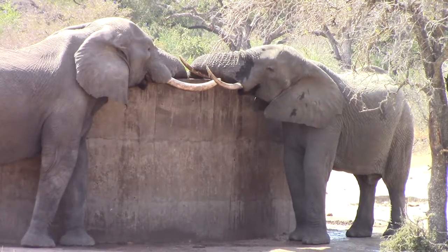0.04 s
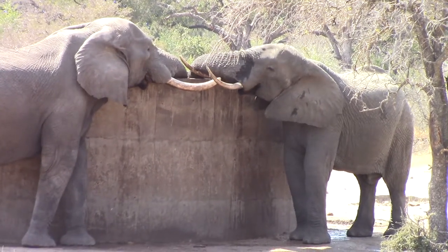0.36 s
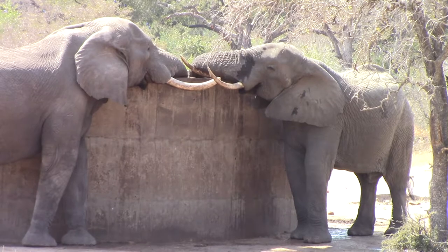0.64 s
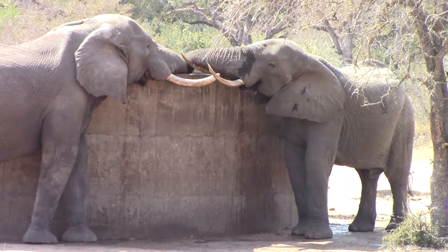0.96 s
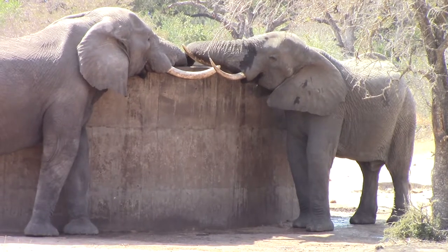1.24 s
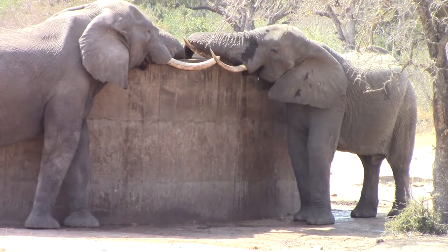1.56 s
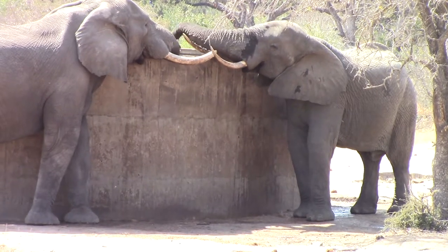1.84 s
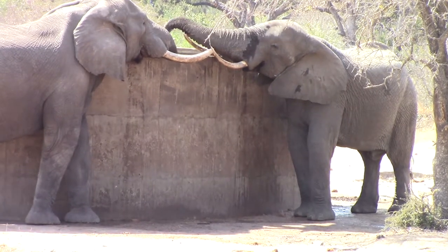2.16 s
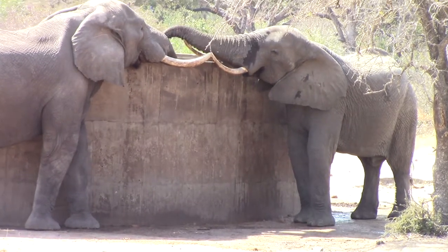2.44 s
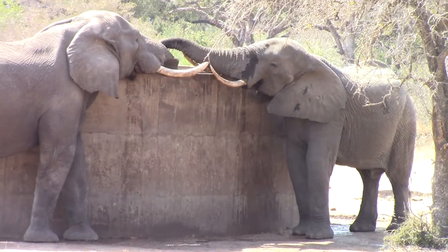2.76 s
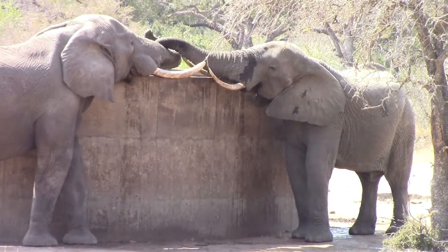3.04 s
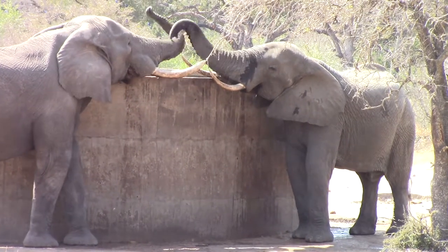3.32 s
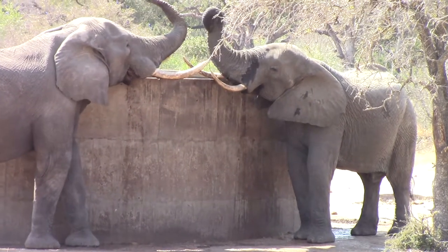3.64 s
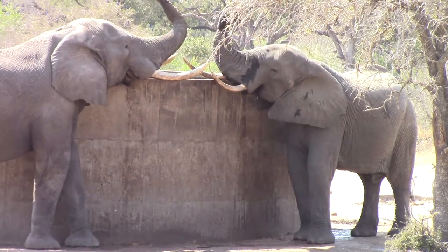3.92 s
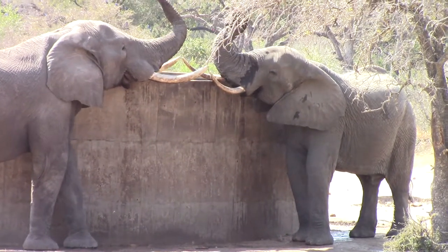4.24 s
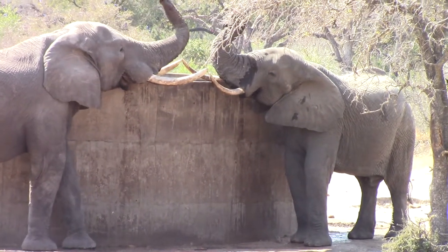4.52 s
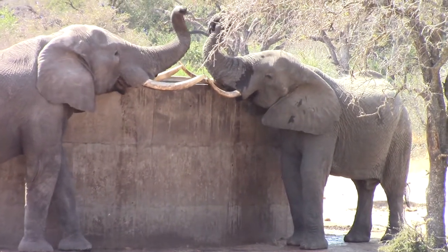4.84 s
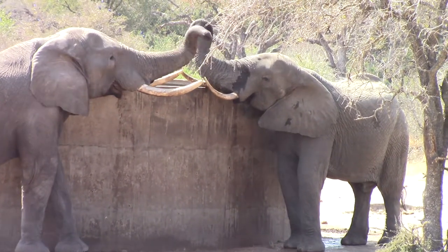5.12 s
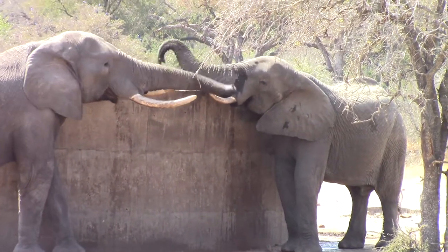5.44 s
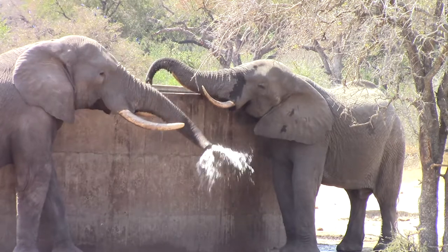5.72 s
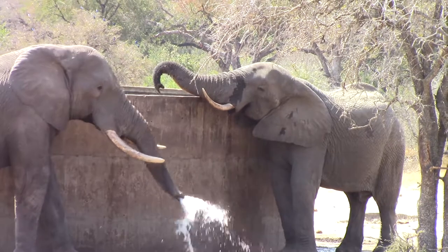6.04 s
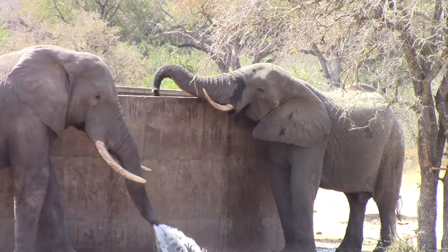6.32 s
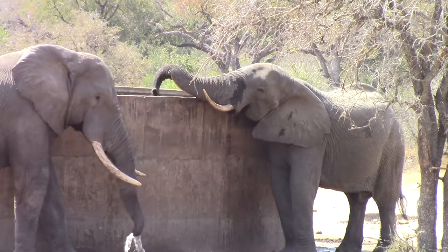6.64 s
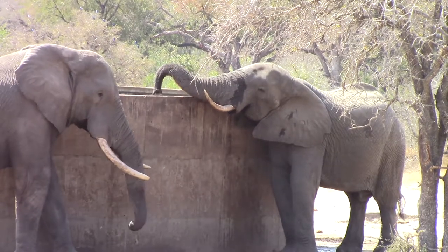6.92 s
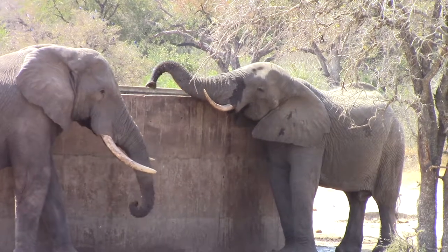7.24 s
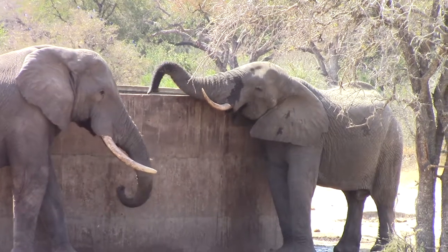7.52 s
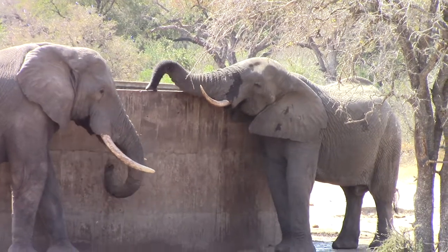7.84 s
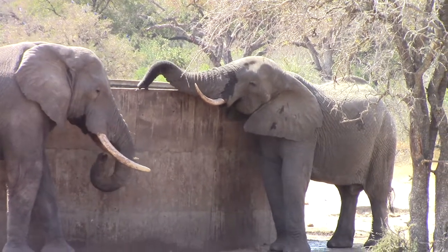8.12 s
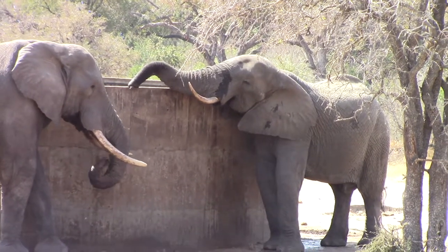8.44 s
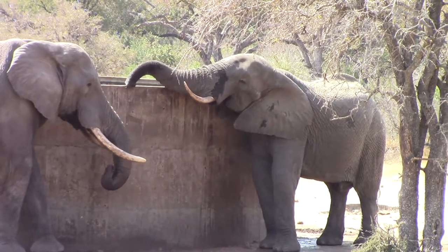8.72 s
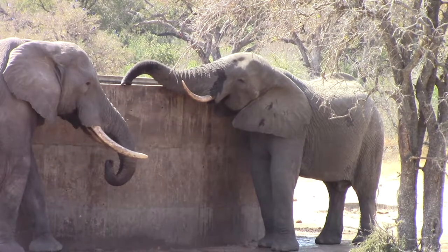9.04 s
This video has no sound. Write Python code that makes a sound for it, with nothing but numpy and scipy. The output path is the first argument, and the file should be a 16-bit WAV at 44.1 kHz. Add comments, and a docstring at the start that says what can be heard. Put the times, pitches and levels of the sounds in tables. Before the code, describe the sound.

Wind buffets the microphone outdoors in dry bush from the start, with low, fluttering thumps and crackles. It is loudest in the first half second, stays gusty until about 3 seconds, then thins out by 5. Behind it lie a faint hiss and a far-off chattering whirr, with a tiny bird peep near 3 seconds. Around 5.6 seconds an elephant starts spluttering water from its trunk. From 6 seconds, spray and heavy drops splash onto the ground in two quick surges, and a short, hollow puff of air rings the trunk at about 6.6. The patter dies away just after 7 seconds, as a distant bird gives one faint falling whistle. A soft, broad rush with a thin, wavering whine swells from there to the end at about 9 seconds, while dull wind bumps return from around 7.5.

```python
"""Elephants at a water tank

Dry bush, two close microphone ports, wind buffeting them. An elephant blows out a load of water:
drops spatter on the ground, a last puff of air rings the trunk, and the patter dies away.
Far off a faint whirr chatters; birds peep and whistle; a broad rush with a thin whine swells last."""
import sys
import numpy as np
from scipy import signal
from scipy.fft import rfft, irfft, next_fast_len
from scipy.io import wavfile

SR = 44100
rng = np.random.default_rng(int(sys.argv[2]) if len(sys.argv) > 2 else 0)


def generate_wav(sig):
    """Save sig (samples, or channels by samples) to the path in sys.argv[1] as 16-bit PCM at SR."""
    pcm = np.round(np.clip(np.atleast_2d(sig).T, -1, 1) * 32767).astype(np.int16)
    wavfile.write(sys.argv[1], SR, pcm)


N = 404397
TIME = np.arange(N) / SR


def undb(db):
    """Decibels to gain."""
    return 10 ** (np.asarray(db) / 20)


def unit(x):
    """Scale to rms 1."""
    return x / np.sqrt(np.mean(x ** 2) + 1e-30)


def curve(rows, column=1):
    """One column of a table, joined by straight lines in time."""
    rows = np.array(rows)
    return np.interp(TIME, rows[:, 0], rows[:, column])


def phase(hz):
    """Running phase of a pitch curve, in radians."""
    return 2 * np.pi * np.cumsum(hz) / SR


def shape(x, response):
    """Filter by a response given as a function of frequency."""
    size = next_fast_len(x.shape[-1], real=True)
    hz = np.maximum(np.arange(size // 2 + 1) * SR / size, 1)
    return irfft(rfft(x, size) * response(hz), size)[..., :x.shape[-1]]


def colour(x, points):
    """Filter through (hz, db) points, falling away below the first; rms 1."""
    hz, db = np.transpose(points)
    def response(f):
        return undb(np.interp(np.log(f), np.log(hz), db)) * np.minimum(f / hz[0], 1) ** 2
    return unit(shape(x, response))


def resonance(f, hz, width):
    """Response of one band-pass resonance."""
    return 1 / (1 + 1j * (f * f - hz * hz) / (f * width))


def ring(x, modes, widen):
    """Pass x through parallel resonances, their widths multiplied by widen."""
    return shape(x, lambda f: sum(undb(db) * abs(resonance(f, hz, widen * width)) ** 2
                                  for hz, width, db in modes))


def walk(per_s, size=N):
    """Smooth random wandering with a spread near 1."""
    at = np.arange(size) * per_s / SR
    knots = int(at[-1]) + 2
    return 1.4 * np.interp(at, np.arange(knots), rng.standard_normal(knots))


def blurred_tone(hz, per_s):
    """A tone on a pitch curve whose strength and phase wander."""
    return unit(walk(per_s) * np.cos(phase(hz)) + walk(per_s) * np.sin(phase(hz)))


def stereo(make, side_db, apart_hz):
    """Two close microphone ports: long waves reach both alike, short ones differ."""
    side = shape(make(), lambda f: 0.003 + 1 / np.sqrt(1 + (apart_hz / f) ** 4))
    return make() + undb(side_db) * side * np.array([[1], [-1]])


def burst(duration_s, rough_db, size):
    """A ragged bell of noise with faint longer skirts, centred in its buffer."""
    t = abs(np.arange(size) - size // 2) / SR / duration_s
    swell = np.exp(-1.7 * t ** 2) + .045 * np.exp(-t / 2)
    return rng.standard_normal(size) * swell * undb(rough_db * np.tanh(walk(349.4, size)))


def add(out, centre_s, x, db):
    """Mix in x with the energy of 10 ms at the given level."""
    at = int(centre_s * SR) - len(x) // 2 + np.arange(len(x))
    inside = (at >= 0) & (at < N)
    gain = undb(db) * np.sqrt(.01 * SR / np.sum(x ** 2))
    out[at[inside]] += gain * x[inside]


def band_bursts(table):
    """Short bursts of noise, each ringing one band."""
    out = np.zeros(N)
    for centre_s, db, hz, width, duration_s in table:
        noise = burst(duration_s, rough_db=5.5, size=32768)
        add(out, centre_s, shape(noise, lambda f: resonance(f, hz, width) ** 2), db)
    return out


# Chirps in one turn of the far-off whirr: share_of_turn, relative_db
TURN_CHIRPS = [(.23, 1), (.48, -.5), (.975, 0)]
def chatter(turn_hz=7.1, pitch_hz=1522, fall_hz_per_s=3200, rise_s=.005, decay_s=.011):
    """Three short falling chirps on every turn; each swells quickly and rings out."""
    share, db = np.transpose(TURN_CHIRPS)
    ages = ((TIME * turn_hz - share[:, None] + .5) % 1 - .5) / turn_hz
    envelopes = np.exp(-(np.minimum(ages, 0) / rise_s) ** 2 - np.maximum(ages, 0) / decay_s)
    sounding_age = (ages * envelopes).sum(axis=0) / envelopes.sum(axis=0)
    hz = pitch_hz - fall_hz_per_s * sounding_age + 28 * walk(110)
    return unit(undb(db) @ envelopes * undb(walk(30)) * np.sin(phase(hz)))


# Base level that hiss and whirr follow: time_s, level_db
AMBIENCE_LEVEL = [(0.0, -68.5), (0.84, -70.5), (1.74, -65.5), (1.85, -67.5), (2.07, -71.5), (2.83, -69),
                  (2.97, -66.5), (3.28, -67), (3.63, -64.5), (4.93, -64), (5.5, -64.5)]
# Spectrum of the open air: frequency_hz, relative_db
HISS_SPECTRUM = [(40, -14.5), (90, -14), (140, -12), (200, -8.5), (400, -3.5), (540, -1.5), (780, -5),
                 (950, -6), (1500, -3), (1900, -5), (2800, -4.5), (5400, -10), (6600, -12), (9500, -18.5),
                 (13000, -24), (15500, -30)]
# Resonances of the far-off whirr: pitch_hz, half_width_hz, relative_db
WHIRR_MODES = [(1225, 22, -12.5), (1312, 12, -6.5), (1384, 22, -8.5), (1600, 16, -11.5), (1865, 20, -19),
               (2170, 25, -16), (2395, 34, -15), (2600, 40, -19), (2770, 20, -19), (3082, 27, -17)]
def bush_ambience():
    """Slightly wavering hiss all round, with a thin whirr chattering in the distance."""
    def air():
        return colour(rng.standard_normal(N) * undb(.45 * walk(16)), HISS_SPECTRUM)
    hiss = stereo(air, side_db=-9.5, apart_hz=5370)
    whirr = unit(ring(rng.standard_normal(N), WHIRR_MODES, widen=2))
    return (undb(5) * hiss + undb(.1) * whirr + undb(-2.5) * chatter()) * undb(curve(AMBIENCE_LEVEL))


# Swell of the rush at the microphone: time_s, level_db
RUSH_LEVEL = [(0, -100), (5.2, -70), (5.8, -62), (7.05, -51), (7.7, -53.5), (8.1, -49.5), (9.17, -43.5)]
# Its broad spectrum: frequency_hz, relative_db
RUSH_SPECTRUM = [(100, -16.5), (230, -9.5), (420, -10.5), (580, -10), (720, -13.5), (1000, -11),
                 (1550, -13.5), (1900, -6.5), (2500, -13), (3400, -15), (4700, -19.5), (5600, -19),
                 (9000, -32), (15500, -46.5)]
# Narrow bands ringing in it: pitch_hz, width_hz, relative_db
RUSH_BANDS = [(500, 40, -2), (590, 45, 3), (800, 70, 3), (1090, 40, -2), (1230, 25, 0), (1318, 22, 6),
              (1425, 24, 6), (1520, 40, 8), (1605, 24, 2), (1680, 24, 3), (1730, 24, 1), (1860, 45, -4),
              (2200, 50, -3), (2425, 50, 4), (2590, 70, 2), (2770, 35, -1), (2940, 45, 3), (3160, 45, 0),
              (3290, 60, 2), (3690, 50, 0), (3840, 55, 0)]
def rush(ring_db=3.5):
    """A broad, ringing rush whose low and high parts stir separately as it grows."""
    def stirring():
        low = shape(rng.standard_normal(N), lambda f: 1 / (1 + 1j * f / 2000)) * undb(1.16 * walk(31))
        high = shape(rng.standard_normal(N), lambda f: 1 / (1 + 2000j / f)) * undb(0.83 * walk(25))
        return colour(low + high, RUSH_SPECTRUM)
    def ringing(f):
        power = sum(undb(db + ring_db) ** 2 / (1 + (2 * (f - hz) / width) ** 2)
                    for hz, width, db in RUSH_BANDS)
        return np.sqrt(1 + power)
    broad = stereo(stirring, side_db=-13, apart_hz=2740)
    return unit(shape(broad, ringing)) * undb(curve(RUSH_LEVEL))


# Far-off tones within the rush: pitch_hz, relative_db
WHINE_TONES = [(1233, -3.5), (1320, -1), (1425, -7), (1502, 1), (1535, -2), (1600, -4), (2580, -9)]
# Their joint level: time_s, level_db
WHINE_SWELL = [(6.4, -78), (7.0, -61), (7.45, -59), (7.68, -62), (8.0, -58), (8.55, -57), (9.17, -51)]
def whine(waver_hz=6, fade_db=3.5):
    """A distant cluster of thin tones; each wavers, fades and returns on its own."""
    tones = np.zeros(N)
    for hz, db in WHINE_TONES:
        gain = undb(db + fade_db * np.tanh(walk(14)))
        tones += gain * np.sin(phase(hz + waver_hz * walk(40)))
    return unit(tones) * undb(curve(WHINE_SWELL)) * (TIME > WHINE_SWELL[0][0])


# Faint sounds in the bush: centre_s, level_db, pitch_hz, width_hz, duration_s
BUSH_RUSTLES = [(1.285, -62.5, 5700, 1300, 0.027), (1.7, -64, 9000, 5000, .16),
                (2.92, -58, 4970, 2200, 0.055), (4.275, -66, 6500, 600, .02), (4.49, -70, 9000, 1500, .02),
                (4.555, -63, 6500, 700, .02), (4.71, -57, 2570, 260, 0.08), (4.83, -68, 6000, 555.6, 0.022),
                (5.11, -58, 8500, 4200, 0.072), (5.78, -53, 1345, 51, 0.032), (5.96, -53, 1310, 69, 0.041),
                (7.48, -48.5, 1229, 18, 0.08)]
def rustles():
    """Wide bands rustle; narrow ones sound as peeps and thin tones."""
    return band_bursts(BUSH_RUSTLES)


# A small bird, faint at the microphone: time_s, pitch_hz, level_db
PEEP_NOTE = [(2.805, 5100, -85), (2.835, 5050, -69), (2.86, 4900, -71), (2.88, 4830, -69.5),
             (2.9, 4750, -85)]
def bird_peep():
    """One thin, high note that slides down a little."""
    sounding = (TIME > PEEP_NOTE[0][0]) & (TIME < PEEP_NOTE[-1][0])
    return blurred_tone(curve(PEEP_NOTE), per_s=420) * sounding * undb(curve(PEEP_NOTE, column=2))


# A distant bird among the trees: time_s, pitch_hz, level_db
WHISTLE_NOTE = [(6.95, 2800, -80), (6.98, 2650, -59), (7.02, 2250, -57), (7.045, 1730, -52),
                (7.075, 1700, -48), (7.1, 1690, -54), (7.14, 1680, -80)]
def bird_whistle():
    """One slurred whistle: scattering among the trees blurs the fall; the held note is clear."""
    hz = curve(WHISTLE_NOTE)
    clarity = np.interp(TIME, [7.02, 7.05], [0, .9])
    tone = np.sqrt(2) * np.sin(phase(hz * (1 + 0.0081 * walk(89))))
    voice = clarity * tone + (1 - clarity) * blurred_tone(hz, per_s=300)
    sounding = (TIME > WHISTLE_NOTE[0][0]) & (TIME < WHISTLE_NOTE[-1][0])
    return voice * sounding * undb(curve(WHISTLE_NOTE, column=2))


def port(x, edge_hz, cut_hz, knee_hz=350, steep=2.0):
    """Wind pressure at the port: low cut, broad hump, slope, and an edge set by the smallest swirls."""
    def response(f):
        s = 1j * f / cut_hz
        low_cut = s ** 3 / ((s + 1) * (s * s + s + 1))
        leak = 0.0047 * s / (s + 1)
        hump = 1 + undb(5.5) * resonance(f, hz=335, width=290)
        edge = np.sqrt(1 + (f / edge_hz) ** (2 * steep))
        return (low_cut + leak) * hump / (1 + 1j * f / knee_hz) / edge
    return shape(x, response)


def eddy(duration_s, edge_hz):
    """One swirl at the port: fast ones crackle, slow ones are a dull bump."""
    cut_hz = 180 * (edge_hz / 800) ** 0.39  # slow, large eddies reach further into the bass
    return port(burst(duration_s, rough_db=8.5, size=8192), edge_hz, cut_hz, steep=2.88)


# Gusts over the microphone: start_s, end_s, level_db, eddy_edge_hz
MIC_GUSTS = [(0, 0.173, -31.5, 560), (.19, 0.674, -41.5, 1000), (0.704, 1.588, -49, 680),
             (1.662, 2.39, -53, 680), (2.4, 3.229, -51.5, 720), (3.382, 3.464, -57, 500),
             (3.816, 4.217, -60.5, 450), (4.404, 4.422, -60.5, 413), (4.773, 5.063, -66, 450),
             (7.343, 8.397, -61, 197), (8.684, 9.171, -62.5, 190)]
# Hard eddies that thump it: centre_s, level_db, duration_s, edge_hz
HARD_EDDIES = [(0.027, -23.5, 0.0032, 1150), (0.039, -19.5, 0.005, 1140), (0.046, -21.5, 0.02, 320),
               (0.08, -25, 0.0032, 700), (0.095, -19.5, 0.0045, 500), (0.171, -21.5, 0.0077, 945),
               (0.2, -23.5, 0.0071, 1800), (0.216, -20.5, 0.0074, 1340), (0.226, -27.5, 0.0073, 1010),
               (0.276, -28.5, 0.023, 900), (0.328, -29, 0.017, 1870), (0.352, -27.5, 0.018, 1180),
               (0.37, -23, 0.0053, 1180), (0.385, -28, 0.0099, 1700), (0.43, -23.5, 0.0077, 1970),
               (0.455, -29, 0.015, 1060), (0.483, -30.5, 0.011, 810), (0.518, -30, 0.015, 1250),
               (0.53, -32.5, 0.0093, 1900), (0.556, -25.5, 0.0055, 1250), (0.572, -27, 0.0091, 1470),
               (0.585, -28, 0.012, 1390), (0.609, -31, 0.0065, 1100), (0.65, -37, 0.0046, 1000),
               (0.66, -32, 0.0053, 1200), (0.732, -33.5, 0.0068, 620), (0.783, -31, 0.01, 816),
               (0.856, -32.5, 0.005, 500), (0.881, -34, 0.028, 550), (0.962, -27, 0.014, 950),
               (0.971, -30, 0.003, 1310), (1.159, -36.5, 0.01, 730), (1.228, -35, 0.003, 800),
               (1.26, -34.5, 0.016, 1062), (1.308, -39.5, 0.004, 770), (1.357, -31, 0.01, 580),
               (1.378, -31.5, 0.0042, 980), (1.413, -33.5, 0.048, 870), (1.717, -27, 0.021, 606),
               (1.782, -23.5, 0.0043, 765), (1.797, -30.5, 0.011, 520), (1.817, -26, 0.0071, 860),
               (1.933, -32, 0.0091, 1220), (1.976, -30.0, 0.025, 740), (2, -40, 0.02, 850),
               (2.022, -27, 0.011, 1120), (2.037, -33.5, 0.0063, 950), (2.053, -28, 0.0023, 610),
               (2.094, -39.5, 0.0063, 420), (2.166, -28.5, 0.015, 1060), (2.185, -33, 0.011, 1120),
               (2.231, -33, 0.021, 500), (2.251, -34.5, 0.014, 730), (2.275, -32, 0.02, 850),
               (2.37, -32, 0.014, 535), (2.467, -30.5, 0.029, 1116), (2.486, -27.5, 0.015, 1180),
               (2.507, -24.5, 0.015, 1420), (2.542, -35, 0.018, 940), (2.563, -37.5, 0.009, 850),
               (2.585, -38, 0.0088, 1320), (2.609, -31, 0.015, 960), (2.689, -32.5, 0.007, 810),
               (2.731, -42.5, 0.008, 730), (2.883, -40.5, 0.011, 1250), (2.9, -32.5, 0.012, 1300),
               (2.93, -34, 0.0084, 580), (2.96, -35, 0.03, 550), (3.048, -29, 0.012, 950),
               (3.061, -24.5, 0.007, 1170), (3.075, -35.5, 0.015, 850), (3.16, -32, 0.009, 910),
               (3.447, -46, 0.014, 620), (3.803, -38.5, 0.0016, 464), (3.945, -41.5, 0.012, 518),
               (4.024, -38.0, 0.016, 360), (4.05, -36, 0.0048, 520), (4.093, -49, 0.0083, 270),
               (4.147, -39.5, 0.0023, 400), (4.179, -51, 0.004, 400), (4.206, -48, 0.003, 400),
               (4.43, -27, 0.0039, 570), (4.426, -43, 0.02, 300), (4.794, -47, 0.02, 260),
               (4.826, -43, 0.012, 450), (4.978, -43.5, 0.013, 246), (5.008, -50, 0.0063, 420),
               (7.617, -45, 0.012, 289.5), (7.742, -41, 0.021, 200.7), (7.781, -42, 0.014, 210),
               (7.979, -45.5, 0.013, 285), (8.104, -40.5, 0.0076, 492), (8.235, -48.5, 0.023, 160),
               (8.356, -45.5, 0.015, 180), (8.703, -36, 0.019, 260), (8.734, -39, 0.017, 200),
               (8.778, -36.5, 0.026, 212), (8.906, -38.5, 0.018, 190), (9.167, -29.5, 0.0096, 219)]
# Sharp cracks inside the hardest: centre_s, level_db, edge_hz
EDDY_CRACKS = [(.041, -33, 1400), (0.0818, -35.5, 1950), (0.1712, -39, 1300), (0.199, -39, 1900),
               (0.331, -37, 2100), (0.373, -35, 1010), (0.4307, -34, 2000), (0.533, -37, 1900),
               (0.565, -38.5, 1780), (0.607, -38.5, 1400), (.648, -44, 1450), (0.664, -39.5, 1570),
               (.787, -43, 1150), (.974, -34, 1700), (1.715, -46, 1200), (1.93, -44, 1390),
               (2.017, -41, 1446), (2.04, -44, 1300), (2.189, -44, 1350), (2.511, -33.5, 1710),
               (2.582, -42, 1300), (3.044, -43, 1500), (3.16, -42.5, 1290)]
def buffeting(rise_s=.039, fall_s=.047, small_per_s=48, scatter_db=3):
    """Gusts flutter right on the microphone and carry eddies, many small and some hard."""
    flutter = rng.standard_normal(N) * undb(7 * np.tanh(walk(70)))
    gusts = [undb(db) * np.exp(-np.maximum(start - TIME, 0) / rise_s - np.maximum(TIME - end, 0) / fall_s)
             for start, end, db, _ in MIC_GUSTS]
    out = unit(port(flutter, edge_hz=187, cut_hz=159)) * np.max(gusts, axis=0)
    for centre_s, db, duration_s, edge_hz in HARD_EDDIES:
        add(out, centre_s, eddy(duration_s, edge_hz), db)
    for centre_s, db, edge_hz in EDDY_CRACKS:
        snap = burst(0.00033, rough_db=-10, size=2048)
        add(out, centre_s, port(snap, edge_hz, cut_hz=320, knee_hz=1800, steep=3.64), db)
    # small eddies come at random while a gust holds
    count = int(TIME[-1] * small_per_s)
    times = (np.arange(count) + rng.random(count)) / small_per_s
    over_gust_db = .5 + scatter_db * rng.standard_normal(count)
    for centre_s, over_db in zip(times, over_gust_db):
        for start, end, db, edge_hz in MIC_GUSTS:
            if start < centre_s < end:
                add(out, centre_s, eddy(0.0024, edge_hz), db + over_db)
    return out


# Difference between the two microphone ports: time_s, side_db
WIND_WIDTH = [(0, 0), (.1, -5), (.3, -28), (.6, -35), (1, -39)]
def wind():
    """The opening gust strikes the two ports unequally, later ones almost alike."""
    return stereo(buffeting, side_db=curve(WIND_WIDTH), apart_hz=1100)


# Air column of the trunk: pitch_hz, nominal_width_hz, relative_db
TRUNK_MODES = [(174, 160, -10.5), (612, 105, -0.5), (915, 300, -12), (1392, 25, 16), (1840, 1400, -0.5),
               (2310, 170, 4)]
def trunk_puff():
    """The last of the water leaves with a short puff of air that rings the trunk."""
    out = np.zeros(N)
    breath = burst(duration_s=.05, rough_db=-2, size=16384)
    add(out, 6.596, ring(breath, TRUNK_MODES, widen=1.06), db=-31.2)
    return out


# Water beside the tank, and one low thump of the trunk at 6.62 s: centre_s, level_db, pitch_hz, width_hz,
# duration_s
WATER_SPLATS = [(5.535, -65, 6500, 4000, .008), (5.66, -56.5, 7300, 2600, 0.035),
                (5.676, -59, 8500, 2600, 0.0023), (5.745, -54, 5260, 5000, 0.075),
                (5.995, -69, 8800, 1500, .003), (6.05, -59, 8500, 6000, .015),
                (6.073, -53, 4000, 4000, 0.0015), (6.095, -46, 4000, 4500, 0.044),
                (6.1025, -45.5, 6200, 3600, 0.0005), (6.14, -48.5, 10000, 4500, 0.04),
                (6.149, -48, 8500, 3000, .001), (6.178, -53, 6000, 4000, .001),
                (6.208, -46, 3400, 3000, 0.022), (6.223, -53, 4000, 3500, .001),
                (6.287, -48, 3520, 2500, 0.0053), (6.33, -50, 5500, 4000, .002),
                (6.359, -52, 7500, 3000, .004), (6.41, -46, 5000, 3500, .008), (6.5, -46, 7000, 4500, .04),
                (6.62, -53, 160, 90, .016), (6.755, -56, 6500, 4000, .003), (6.76, -42.5, 2480, 2000, 0.1),
                (6.84, -50, 8000, 2400, .07), (7.14, -61, 5500, 3000, .01), (7.783, -64, 7900, 3496, .003)]
def splats():
    """Single slaps, drips and splutters around the main load of water, and a low thump of the trunk."""
    return band_bursts(WATER_SPLATS)


def drops(spectrum, per_s, spread_db, flicker_per_s):
    """Impacts on the ground at random moments: many small, a few large."""
    def patter():
        hits = (rng.random(N) < per_s / SR) * rng.standard_normal(N)
        sizes = undb(spread_db * np.minimum(rng.exponential(size=N), 5))
        return colour(hits * sizes * undb(.9 * walk(flicker_per_s)), spectrum)
    return stereo(patter, side_db=-16, apart_hz=3500)


def surge(peak_s, rise_s, fall_db_per_s):
    """A load of water swells to its peak, then patters out."""
    swell = np.exp(-(np.maximum(peak_s - TIME, 0) / rise_s) ** 2)
    return swell * undb(-fall_db_per_s * np.maximum(TIME - peak_s, 0))


# Heavy drops on the ground: frequency_hz, relative_db
SPLASH_SPECTRUM = [(900, -24), (1400, -5.5), (1750, -8), (2100, -2), (2600, 0.5), (3150, -3), (3700, 1),
                   (5300, -5.5), (6250, 0), (6900, -2.5), (8000, -2.5), (10000, -9), (15500, -37)]
# Fine spray: frequency_hz, relative_db
SPRAY_SPECTRUM = [(4000, -23), (6500, 7), (8500, 5), (11000, -2), (13000, -10), (15500, -21)]
# Two surges, timed by their spray: peak_s, rise_s, fall_db_per_s, splash_db, spray_db, splash_lag_s
WATER_SURGES = [(6.14, 0.087, 83, -45, -51, 0.085), (6.385, 0.095, 39.5, -42.5, -52.5, 0.016)]
def blown_water(splash_slower=1.23, wall_echo_s=.0065):
    """Fine spray ticks, heavy drops splash after it; the tank wall throws both back a moment later."""
    splash = drops(SPLASH_SPECTRUM, per_s=10000, spread_db=1.3, flicker_per_s=90)
    spray = drops(SPRAY_SPECTRUM, per_s=7000, spread_db=2.1, flicker_per_s=70)
    heavy, fine = [], []
    for peak, rise, fall, splash_db, spray_db, lag in WATER_SURGES:
        heavy.append(undb(splash_db) * surge(peak + lag, rise * splash_slower, fall / splash_slower))
        fine.append(undb(spray_db) * surge(peak, rise, fall))
    direct = splash * np.linalg.norm(heavy, axis=0) + spray * np.linalg.norm(fine, axis=0)
    return direct + 0.19 * np.roll(direct, int(wall_echo_s * SR), axis=1)


def scene():
    """Everything as it reaches the microphone."""
    background = bush_ambience() + rush() + whine()
    elephant = blown_water() + trunk_puff()
    birds = bird_whistle() + bird_peep()
    return background + elephant + birds + splats() + rustles() + wind()


def record(dry):
    """The recorder cuts the top steeply above 15.7 kHz."""
    return signal.sosfilt(signal.ellip(10, .2, 80, 15700, fs=SR, output="sos"), dry)


dry = scene()
out = record(dry)
generate_wav(out)
```